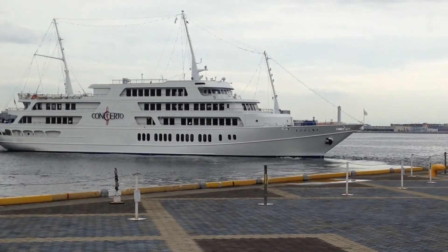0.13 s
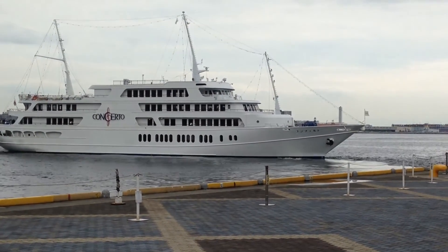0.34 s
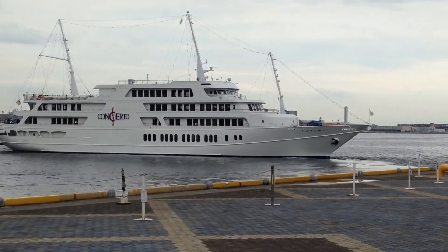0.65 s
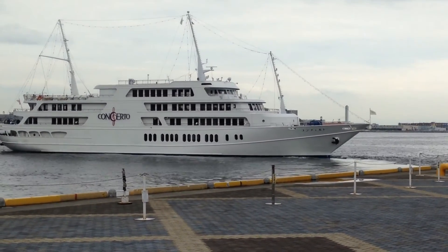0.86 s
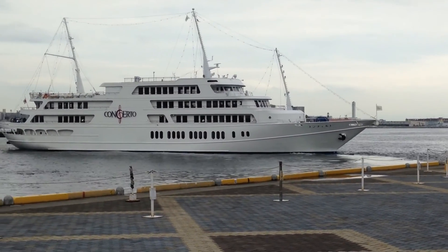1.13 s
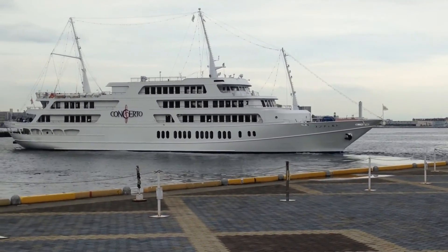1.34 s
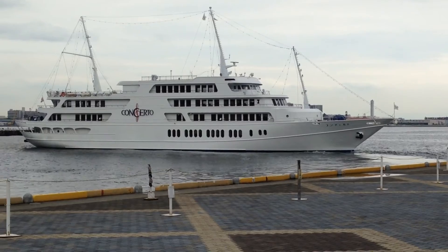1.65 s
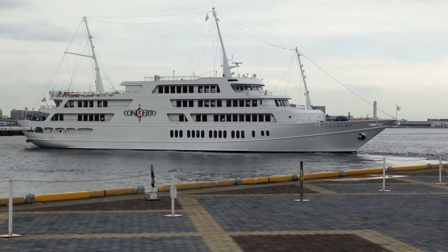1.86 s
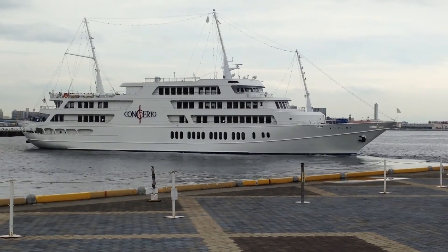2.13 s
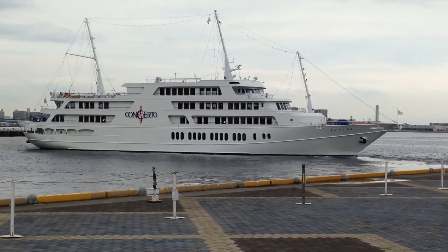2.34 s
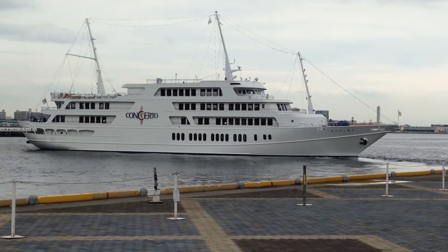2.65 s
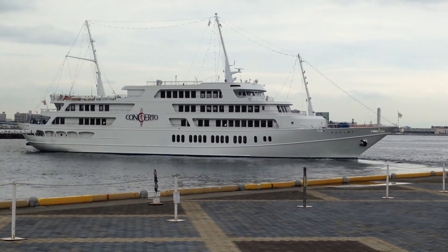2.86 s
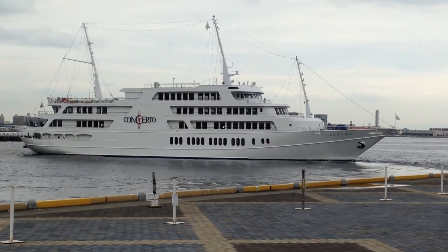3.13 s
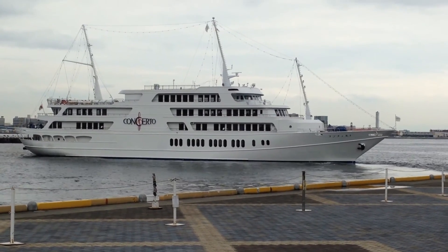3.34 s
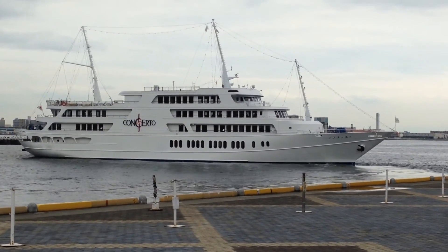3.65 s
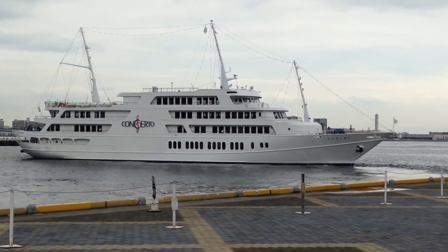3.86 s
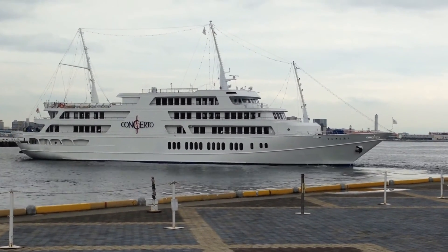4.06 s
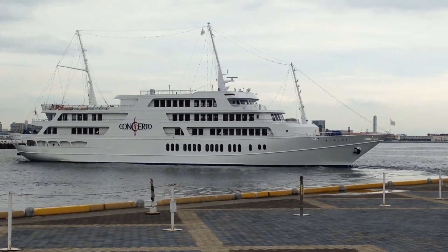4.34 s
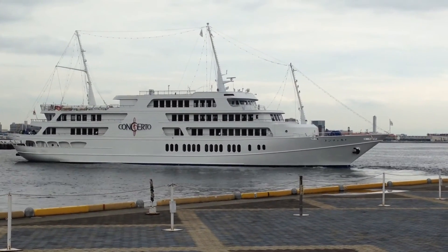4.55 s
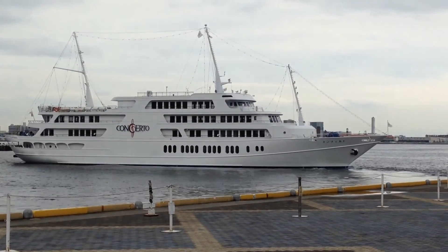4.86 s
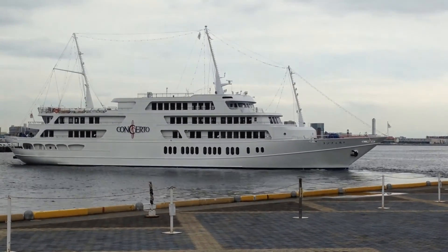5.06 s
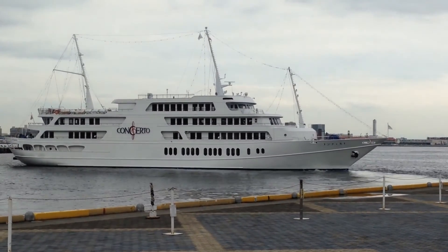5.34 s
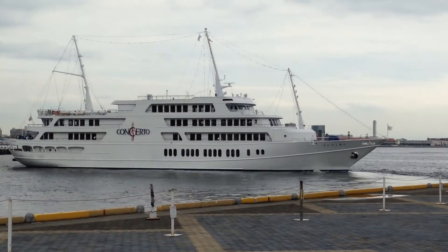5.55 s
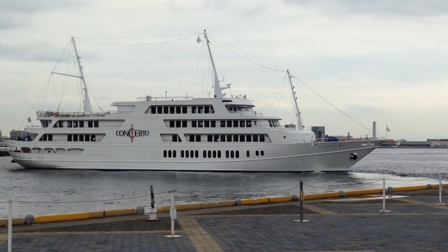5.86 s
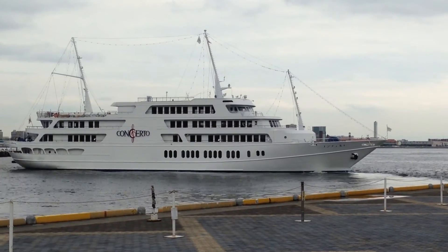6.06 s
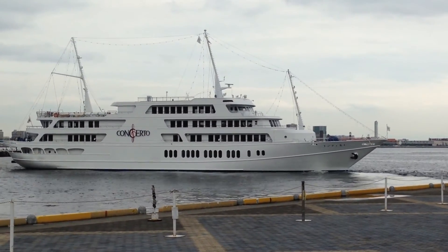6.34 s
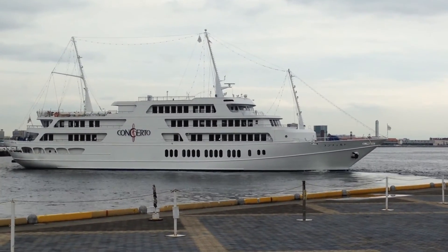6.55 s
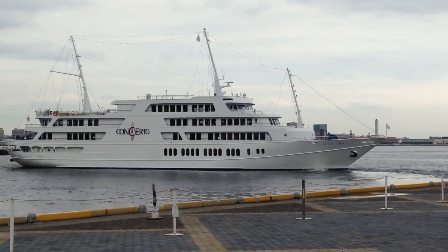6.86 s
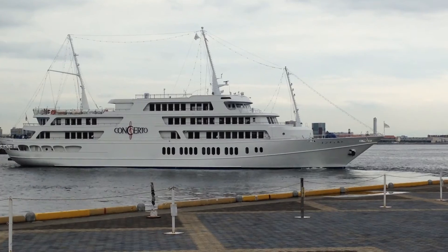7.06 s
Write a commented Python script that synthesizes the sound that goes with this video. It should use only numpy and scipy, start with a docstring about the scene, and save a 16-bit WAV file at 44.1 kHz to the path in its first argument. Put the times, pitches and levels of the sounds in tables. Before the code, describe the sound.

Low, pulsing engine drone from a big vessel passing slowly by a quay, over faint fizzing water, airy harbour rush and wind on the microphone.

```python
"""A cruise ship slides slowly past an open quay. Its two diesels run at slightly different speeds, so their
exhaust notes, built from multiples of the firing rates, beat into a throb over a dull roar of shaped noise.
Generators hum as sine waves. The bow wave fizzes and splashes with bursts of noise and short ringing grains.
Ventilation and the harbour rush behind it as noise, a breeze rumbles on the microphone, a few sharp ticks
ring out, and something squeaks faintly on a note that slides upward."""
import sys
import numpy as np
from scipy import signal
from scipy.fft import rfft, irfft
from scipy.io import wavfile

SR = 44100
rng = np.random.default_rng(int(sys.argv[2]) if len(sys.argv) > 2 else 0)


def generate_wav(signal):
    """Clip the signal to [-1, 1] and save it as 16-bit WAV at the path in sys.argv[1]."""
    frames = np.transpose(np.atleast_2d(signal))
    scaled = np.clip(frames, -1, 1) * 32767
    pcm = np.round(scaled).astype(np.int16)
    wavfile.write(sys.argv[1], SR, pcm)


N = 317520
T = np.arange(N) / SR  # time in s
BINS_HZ = np.maximum(np.arange(N // 2 + 1) * SR / N, 1)  # frequencies of the spectrum

# How the exhaust note carries over the water: t/s, level/dB
NOTE_LEVEL = [(0, -42), (.15, -33.5), (.28, -34.5), (.39, -27.3), (.58, -32), (.7, -38.5), (.9, -37),
              (1.02, -33.5), (1.14, -36), (1.25, -29.3), (1.6, -32.5), (1.83, -27.4), (2.07, -28.8),
              (2.35, -32), (2.52, -30), (2.75, -30.3), (2.9, -31), (3.55, -31.8), (3.76, -30.6),
              (4.05, -32.4), (4.3, -31.2), (4.47, -36.5), (4.68, -30.8), (4.9, -34.5), (5.07, -33),
              (5.15, -26.2), (5.85, -25.2), (6.45, -26), (6.63, -28), (6.85, -25.4), (7.2, -25.8)]
# How loud the bow wave is: t/s, level/dB
WASH_LEVEL = [(0, -58.5), (1.95, -59), (2.3, -61.5), (3.9, -62), (4.25, -60), (4.75, -60), (5.25, -58),
              (7.2, -59)]


def undb(db):
    """Turn decibels into a gain."""
    return 10 ** (np.asarray(db) / 20)


def unit(x):
    """Scale to an rms of one."""
    return x / np.sqrt(np.mean(x ** 2))


def curve(table):
    """Join rows of (t/s, value) by straight lines in time."""
    return np.interp(T, *np.transpose(table))


def ramp(start, length):
    """A straight rise from zero to one."""
    return np.clip((T - start) / length, 0, 1)


def hump(middle, length):
    """A smooth rise from zero to one and back."""
    return np.cos(np.pi * np.clip((T - middle) / length, -.5, .5)) ** 2


def walk(rate):
    """Smooth chance wavering of spread one; a higher rate (Hz) makes it move faster."""
    spectrum = rfft(rng.standard_normal(N))
    return unit(irfft(spectrum * np.exp(-(BINS_HZ / rate) ** 2), N))


def colour(x, points):
    """Give a sound a spectrum of (f/Hz, level/dB) points; rms one."""
    hz, db = np.transpose(points)
    bins_db = np.interp(np.log(BINS_HZ), np.log(hz), db)
    return unit(irfft(rfft(x) * undb(bins_db), N))


def band(hz, width_hz):
    """Noise passed through a steep-sided resonance; rms one."""
    detune = (BINS_HZ / hz - hz / BINS_HZ) * hz / width_hz
    return unit(irfft(rfft(rng.standard_normal(N)) / (1 + detune ** 2), N))


def diesel(turns, orders, waver_db):
    """An exhaust note: multiples of the firing rate, each swelling and wavering in the air over the water."""
    note_db = curve(NOTE_LEVEL)
    mean_db = note_db.mean()
    out = np.zeros(N)
    for multiple, db, share in orders:
        level_db = mean_db + db + share * (note_db - mean_db) + waver_db * walk(12)
        out += np.sqrt(2) * undb(level_db) * np.cos(2 * np.pi * multiple * turns)
    return out


def surges():
    """How the sound of the funnel gains and loses on its way over the water, in dB."""
    # Single surges (+) and fades (-): middle t/s, length/s, change/dB
    swells = [(0, 0.52, -5), (0.423, .2, 0.5), (0.762, 0.11, 6), (.85, .07, 3), (0.914, 0.074, -12),
              (1.054, 0.22, 3), (1.323, 0.52, -9.5), (1.7, 0.13, 4), (1.899, 0.085, 6.5), (2.28, 0.18, -2),
              (2.738, .1, 1.5), (4.44, 0.15, -8), (4.604, 0.12, -8), (5.142, .1, 5), (5.25, .1, -2.5),
              (5.376, .1, 3.5), (5.69, .1, 2), (6, .1, 1.5), (6.265, 0.13, 2.5)]
    return sum(db * hump(s, length) for s, length, db in swells)


def roar(slow, fast):
    """Turbulent gas puffs up the funnel at every firing and booms there; it surges and throbs on its way."""
    # Spectrum of the gas: f/Hz, relative level/dB
    gas_colour = [(40, -44), (90, -5.5), (125, -1.5), (152, 0.5), (185, -5), (240, -10), (320, -13),
                  (380, -17), (440, -24.5), (600, -29), (1200, -34.5), (3000, -94)]
    # Level of the funnel's upper resonance against the gas: t/s, level/dB
    rasp_level = [(0, -13.5), (1.1, -13.5), (2.0, -11.5), (2.5, -14), (3.6, -13.8), (4.7, -16),
                  (6.2, -13.3), (7.2, -13.5)]
    puffs = 1 + 0.084 * np.cos(2 * np.pi * slow) + 0.22 * np.cos(2 * np.pi * 2 * fast)
    gas = colour(puffs * rng.standard_normal(N), gas_colour)

    # a boom that climbs as the ship moves on
    boom_hz, rise_hz_per_s, boom_width_hz, boom_db = 127, 7, 13.3, -9
    turns = np.cumsum(boom_hz + rise_hz_per_s * T) / SR
    boom = walk(boom_width_hz) * np.cos(2 * np.pi * turns)
    boom += walk(boom_width_hz) * np.sin(2 * np.pi * turns)
    rasp = undb(curve(rasp_level)) * band(hz=281, width_hz=130)

    roar_db, waver_db, follows_note = -38, 1.17, .05
    note_db = curve(NOTE_LEVEL)
    swell_db = surges() + follows_note * (note_db - note_db.mean())
    # slightly softer when the two engines' second multiples are in step
    throb_db = -0.43 * np.cos(2 * np.pi * 2 * (fast - slow))
    level_db = roar_db + swell_db + throb_db + waver_db * walk(13.6)
    return (gas + boom * undb(boom_db) + rasp) * undb(level_db)


def engines():
    """Two exhaust notes beat against each other over their common roar."""
    # Firing rate of the slower engine, held by its governor: t/s, f/Hz
    slow_speed = [(0, 41.31), (2.3, 41.32), (4.6, 41.41), (5.7, 41.36), (6.5, 41.23), (7.2, 41.3)]
    # Slower exhaust note: multiple of the firing rate, level/dB, swell per dB of the note/dB
    slow_orders = [(1, -17, 0.8), (2, -7.5, 1.25), (3, -12, 0.5), (5, -29.5, 1), (7, -27.5, 1)]
    # Faster exhaust note: multiple of the firing rate, level/dB, swell per dB of the note/dB
    fast_orders = [(2, -0.5, 0.91), (4, -22, 0.56)]
    fast_hz, in_step_s = 43.665, 6.008
    slow = np.cumsum(curve(slow_speed)) / SR
    slow = slow - np.interp(in_step_s, T, slow)  # both engines fire together at this moment
    fast = fast_hz * (T - in_step_s)
    notes = diesel(slow, slow_orders, waver_db=1.4) + diesel(fast, fast_orders, waver_db=0.23)
    return notes + roar(slow, fast)


def generators():
    """Generators and pumps hum at fixed pitches, drifting in level and partly following the roar's surges."""
    # Hum of each machine: f/Hz, level at the start/dB, drift/(dB per s)
    machines = [(59.72, -55, 0.5), (89.1, -46.5, 0), (119.1, -54.5, 0.7), (142.6, -50.5, -0.4),
                (176.4, -65, -0.4), (265.6, -54, -0.58), (315, -62.5, 0.45)]
    follows_roar = 0.49  # share of the roar's surges
    hum = np.zeros(N)
    for hz, db, drift in machines:
        level_db = db + drift * T + 0.85 * walk(2.9)
        hum += np.sqrt(2) * undb(level_db) * np.sin(2 * np.pi * (hz * T + rng.random()))
    return hum * undb(follows_roar * surges())


def breeze():
    """A light, restless wind on the microphone with one lull; now and then an eddy thuds against it."""
    # Spectrum of the wind: f/Hz, relative level/dB
    wind_colour = [(10, -26), (25, -7), (42, -2), (52, 4), (68, 7.5), (84, 2), (103, 7.5), (135, -10),
                   (250, -21.5), (600, -63), (3000, -91)]
    # Gusts on the microphone: middle t/s, length/s, peak level/dB
    gust_table = [(1.225, 0.15, -26), (1.975, 0.078, -36), (2.718, 0.14, -28), (3.495, .1, -33),
                  (4.47, 0.14, -29), (6.01, 0.16, -30), (6.27, 0.081, -34)]
    breeze_db, waver_db, lull_db = -38.5, 0.4, -4
    steady_db = breeze_db + lull_db * hump(middle=3.7, length=2.0) + waver_db * walk(2.0)
    wind = colour(rng.standard_normal(N), wind_colour) * undb(steady_db)
    gusts = sum(undb(db) * hump(s, length) for s, length, db in gust_table)
    return wind + band(hz=64.3, width_hz=42) * gusts


def patchy(flicker_db, rate, count=36):
    """Rushing noise whose narrow bands swell and fade each on their own."""
    centres = np.geomspace(200, 5000, count)
    return sum(np.sqrt(hz) * band(hz, hz / 7) * undb(flicker_db * walk(rate)) for hz in centres)


def air():
    """Ventilation and far harbour: noise in randomly flickering bands, its level partly following the bow wave."""
    # Spectrum of the rush: f/Hz, relative level/dB
    air_colour = [(100, 1.5), (430, 3), (530, 3), (780, 1.5), (960, -3), (1150, -1.5), (1340, -3.5),
                  (1850, -1.5), (2170, -7.5), (2360, -4), (2510, -7), (2620, -18), (4000, -12), (8000, -33)]
    # Level of a hollow tone that comes and goes in the rush: t/s, level/dB
    hollow_level = [(0, -56), (1.5, -54.5), (2.1, -68), (2.95, -54), (4.3, -59.5), (5.6, -65), (7.2, -71)]
    air_db, follows_wash = -49, 0.29  # level, and share of the bow wave's swell
    wash_db = curve(WASH_LEVEL)
    level_db = air_db + follows_wash * (wash_db - wash_db.mean())
    rush = colour(patchy(flicker_db=2.5, rate=16.4), air_colour) * undb(level_db)
    return rush + undb(curve(hollow_level)) * band(hz=510, width_hz=144)


def bubbles(spectrum):
    """Countless bursting bubbles of uneven size, made of random clicks; rms one."""
    size_db, biggest_db = 2.2, 19
    bursts = (rng.random(N) < .4) * rng.standard_normal(N)
    sizes = undb(np.minimum(size_db * rng.exponential(size=N), biggest_db))
    return colour(bursts * sizes, spectrum)


def grains(size=2048):
    """Short ringing grains, each at its own slightly rising pitch, that roughen the foam's noise."""
    grains_per_s, cycles, scatter_db = 700, 110, 2.0
    rise = .02  # share by which the pitch climbs
    out = np.zeros(N + size)
    age = np.arange(size) / SR
    along = age / age[-1]  # from zero to one over the ring
    for when, pitch, chance in rng.random((int(grains_per_s * N / SR), 3)):
        hz = 1000 + 5000 * pitch
        fade = np.exp(-2 * hz * age / cycles) * (1 - along)
        ring = np.sin(2 * np.pi * hz * age * (1 + rise * along / 2)) * fade
        start = int(when * N)
        out[start:start + size] += ring * undb(-scatter_db * np.log(0.014 + chance))
    return out[:N]


def bow_wave():
    """Foam fizzes, roughened by grains, as the wave folds over; later it also throws spray in uneven surges."""
    # Spectrum of the foam: f/Hz, relative level/dB
    wash_colour = [(800, -18), (2000, 0.5), (2750, 0.1), (3100, -0.5), (3400, 0), (3750, 0.3), (4030, 1.9),
                   (4220, -0.5), (4450, 0.9), (4750, -2.5), (5100, -6), (5400, -6), (7000, -10.5),
                   (10000, -19), (15000, -39)]
    # Level of the brighter spray: t/s, level/dB
    spray_level = [(0, -82), (3, -72), (4.7, -74), (5.05, -68.5), (5.3, -63), (5.55, -67), (5.72, -63.5),
                   (5.82, -72), (5.95, -59), (6.08, -70), (6.2, -64), (6.33, -70), (6.5, -65), (6.68, -71),
                   (6.85, -63), (7.2, -68)]
    # Spectrum of the spray: f/Hz, relative level/dB
    spray_colour = [(2000, -17), (2900, 3.5), (3900, 2), (5400, -1), (7000, -12), (10000, -16),
                    (15000, -25)]
    grain_ring_db, surge_db, spray_flicker_db = -1, .35, 1.5  # grains are set against the fizz
    foam = unit(bubbles(wash_colour) + undb(grain_ring_db) * colour(grains(), wash_colour))
    foam *= undb(curve(WASH_LEVEL) + surge_db * walk(13))
    spray = bubbles(spray_colour) * undb(curve(spray_level) + spray_flicker_db * walk(20))
    return foam + spray


def splashes():
    """Wavelets break near the quay: each a short cloud of like-sized bubbles, heard as a puff of noise."""
    # Single laps and splashes: start t/s, level/dB, centre f/Hz, width/Hz, length/s
    laps = [(.115, -59.5, 4100, 1500, 0.037), (0.767, -53, 596, 220, 0.083), (1.38, -55, 3900, 1200, 0.052),
            (1.57, -60, 4000, 1200, .035), (1.99, -57.5, 3700, 1500, .025), (3.212, -50, 770, 420, .07),
            (4.441, -55, 4100, 900, 0.022), (4.604, -52, 617, 250, 0.047), (5.87, -52, 2050, 800, 0.04),
            (5.9, -66, 7400, 2000, .045), (6.7, -71, 5930, 3000, 0.21), (6.79, -55, 745, 500, .1),
            (6.92, -53.5, 4330, 1100, 0.036)]
    out = np.zeros(N)
    for s, db, hz, width_hz, length in laps:
        age = np.maximum(T - s, 0) / (length / 2)  # loudest when this reaches one
        out += undb(db) * band(hz, width_hz) * age * np.exp((1 - age ** 2) / 2)
    return out


def paving(x, reflection):
    """The sound arrives once more off the ground, which ripples its spectrum."""
    # extra delay of the bounce, growing as the ship moves
    bounce_s, bounce_s_per_s = .0032, .00006
    return x + reflection * np.interp(T - bounce_s - bounce_s_per_s * T, T, x)


def ticks():
    """Small sharp ticks: each starts at once and rings out at one pitch."""
    # Single ticks: start t/s, level/dB, f/Hz, time to fade by 60 dB/s
    tick_table = [(3.534, -56.5, 10500, .0015), (4.446, -43.5, 4300, 0.05), (5.917, -56, 7800, .004)]
    out = np.zeros(N)
    for s, db, hz, t60 in tick_table:
        age = np.maximum(T - s, 0)
        out += undb(db) * np.sin(2 * np.pi * hz * age) * np.exp(-np.log(1000) * age / t60)
    return out


def squeak():
    """A faint, hoarse, held note that slides upward, with a thin, fluttering ring above it."""
    start_s, length_s, attack_s, release_s = 4.03, 0.16, 0.028, 0.043
    squeak_db, squeak_hz, rise_hz, hoarse = -54.5, 1476, 278, .45
    ring_db, flutter_db = -13, 3.5  # the ring is set against the note
    fade_start_s = start_s + length_s - release_s
    held = ramp(start_s, attack_s) * (1 - ramp(fade_start_s, release_s))
    glide_hz = squeak_hz + rise_hz * np.sin(np.pi / 2 * ramp(start_s, length_s))
    turns = np.cumsum(glide_hz) / SR
    note = unit(np.sin(2 * np.pi * turns) * (.5 + hoarse * walk(200)))
    ring = band(hz=5060, width_hz=380) * undb(ring_db + flutter_db * walk(30))
    return (note + ring) * undb(squeak_db) * held


def scene():
    """Ship, water and wind in the open air."""
    rush = paving(air() + bow_wave() + splashes(), reflection=0.098)
    return (engines() + generators() + breeze() + rush + ticks() + squeak())[None]


def record(dry):
    """Steady hiss is added and a steep filter cuts the very top."""
    hiss_db, top_hz = -66.5, 15350
    noisy = dry + undb(hiss_db) * rng.standard_normal(dry.shape)
    top_cut = signal.ellip(12, .1, 80, top_hz, fs=SR, output="sos")
    return signal.sosfilt(top_cut, noisy)


dry = scene()
out = record(dry)
generate_wav(out)
```